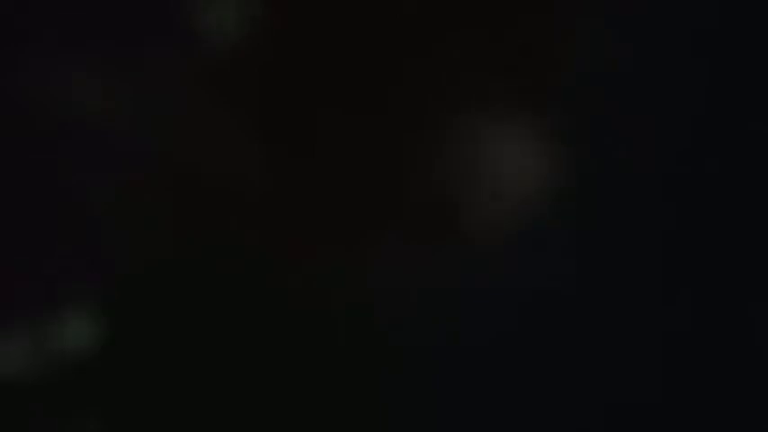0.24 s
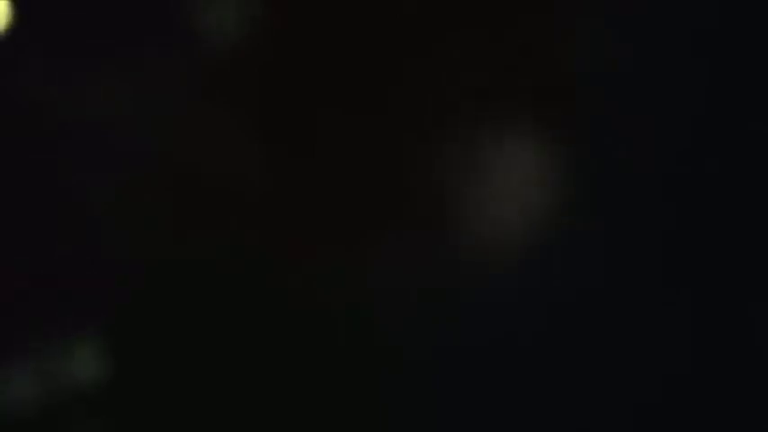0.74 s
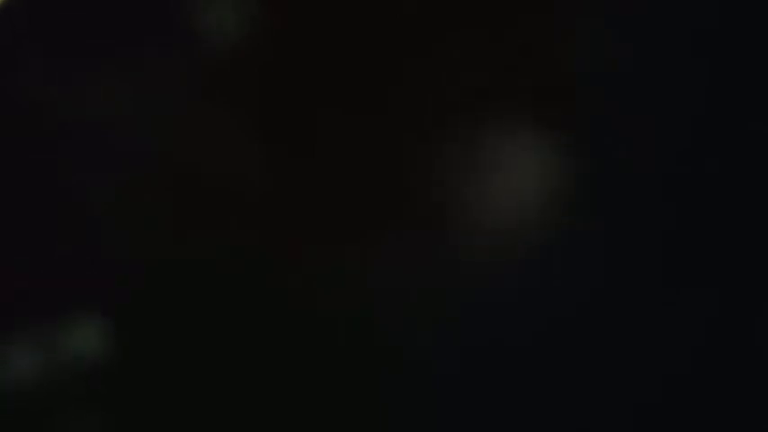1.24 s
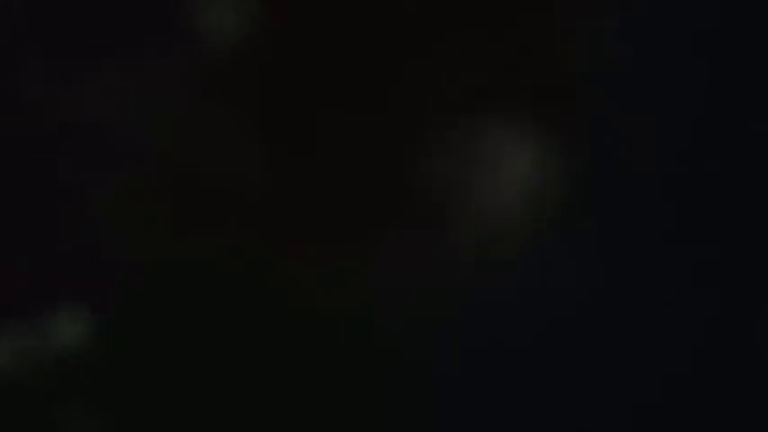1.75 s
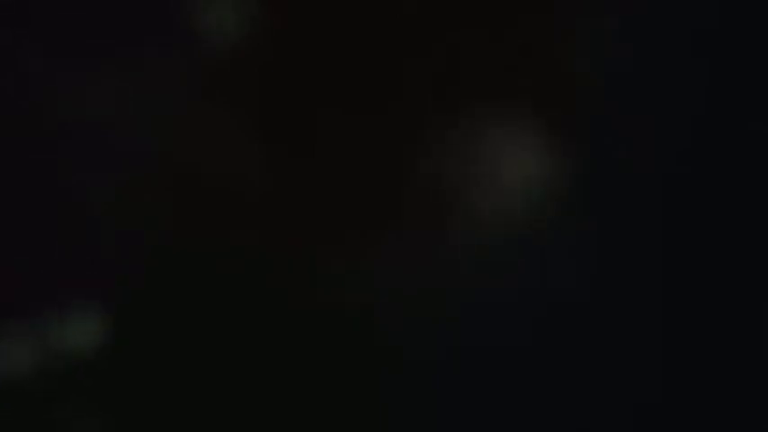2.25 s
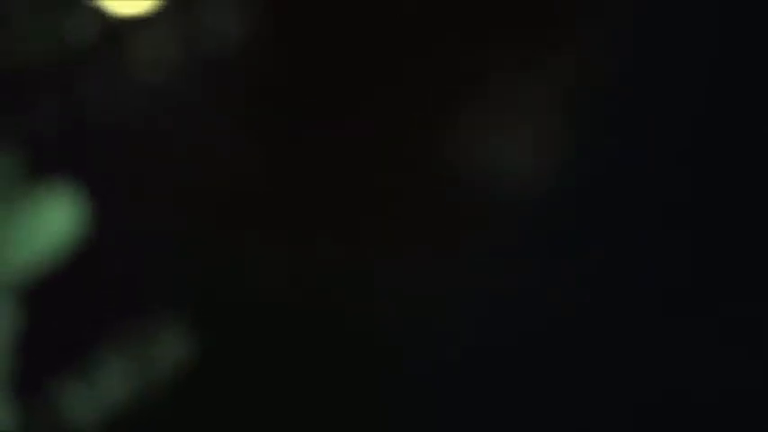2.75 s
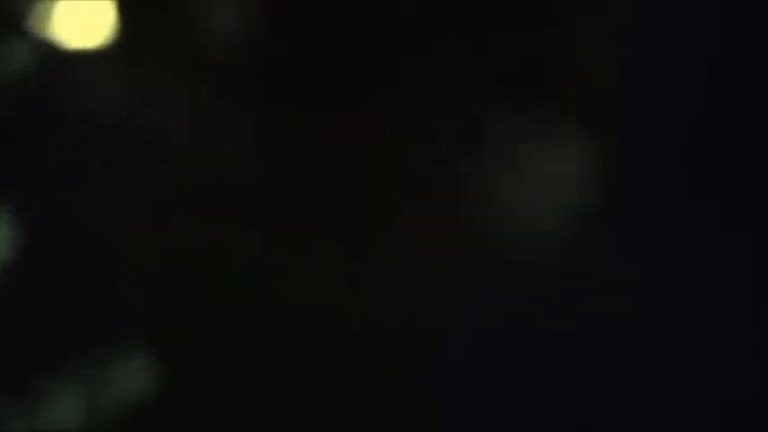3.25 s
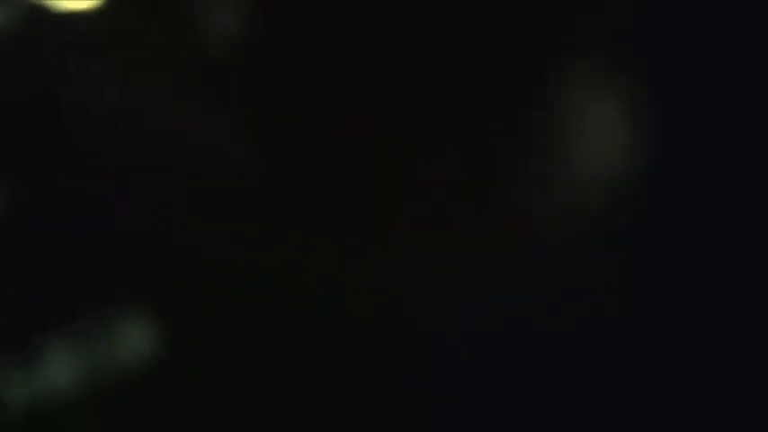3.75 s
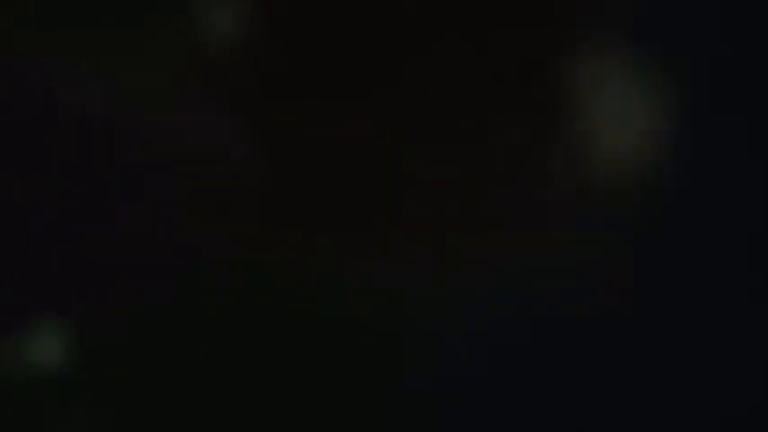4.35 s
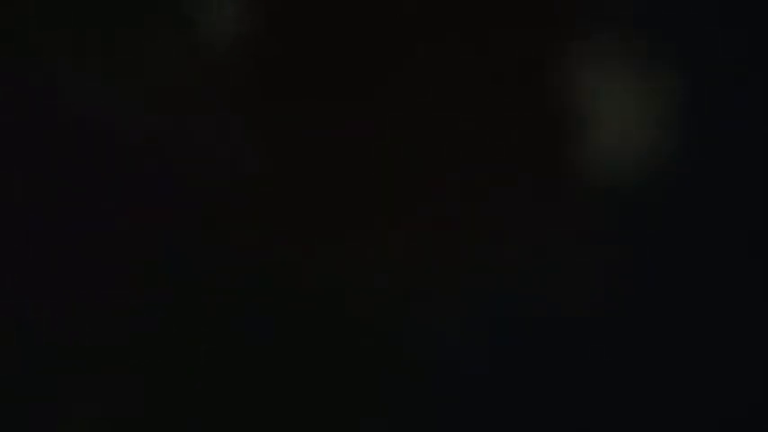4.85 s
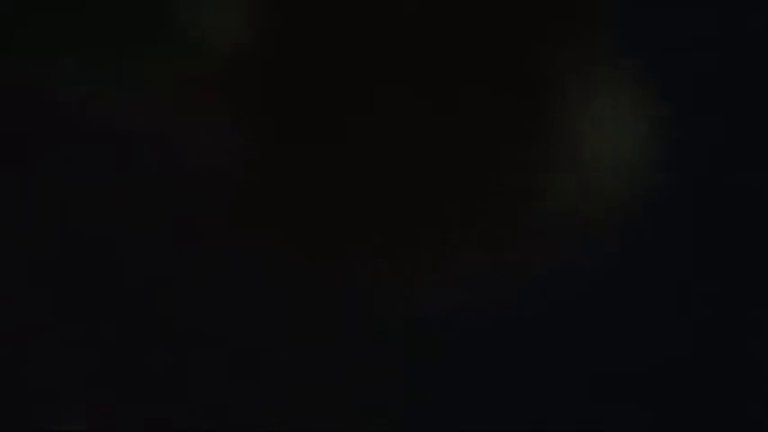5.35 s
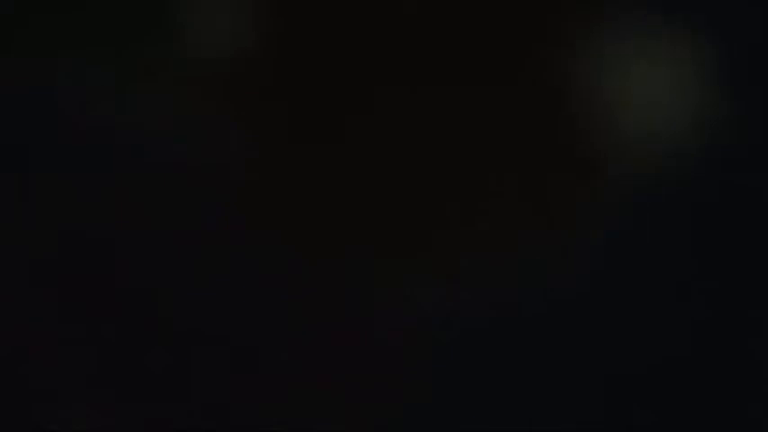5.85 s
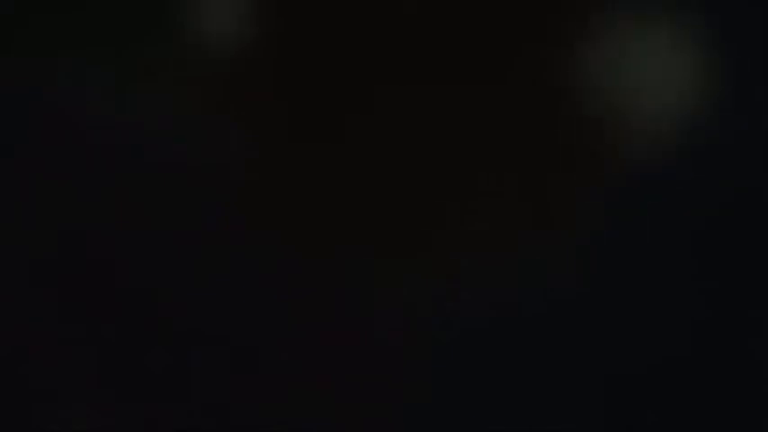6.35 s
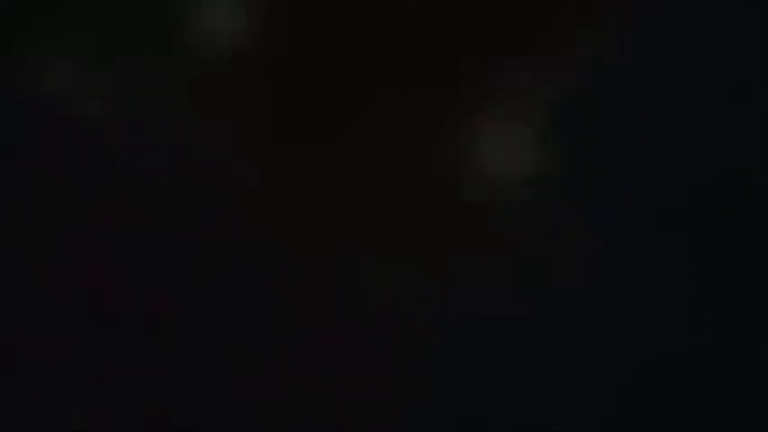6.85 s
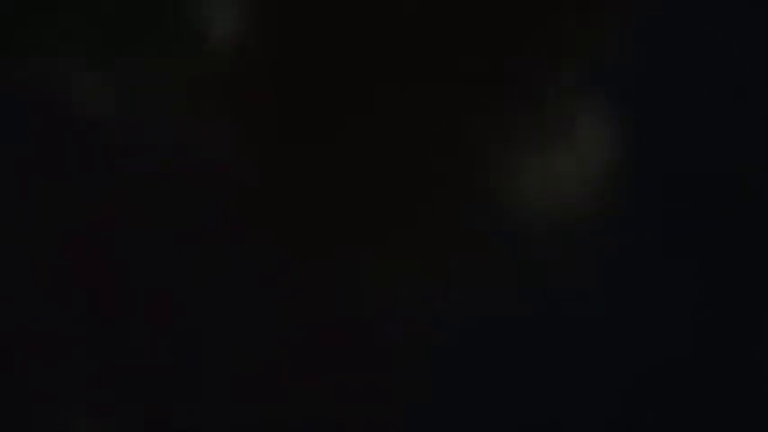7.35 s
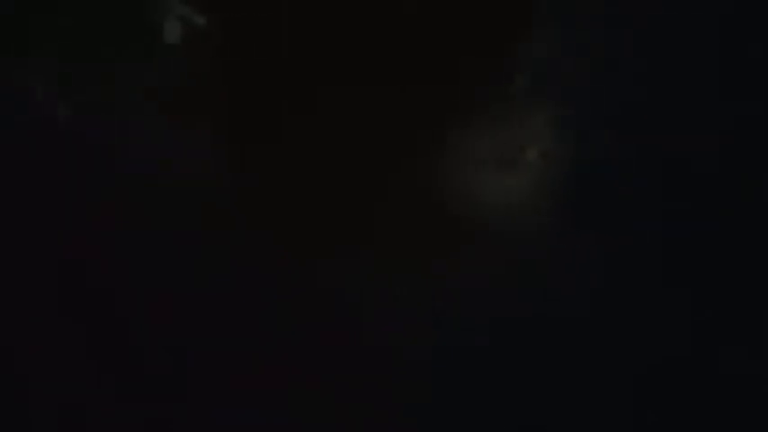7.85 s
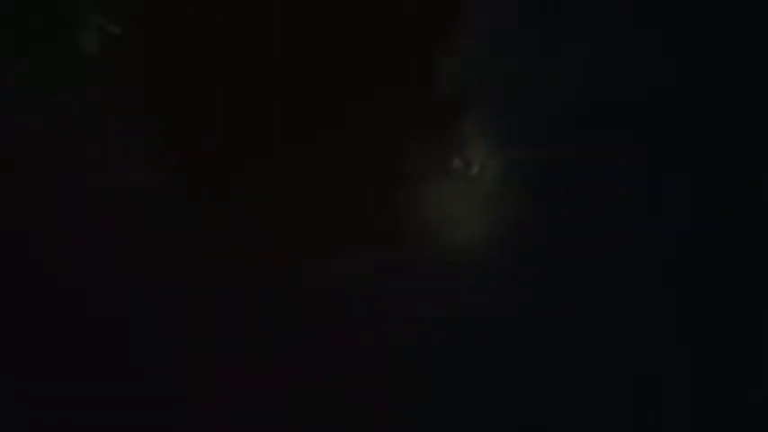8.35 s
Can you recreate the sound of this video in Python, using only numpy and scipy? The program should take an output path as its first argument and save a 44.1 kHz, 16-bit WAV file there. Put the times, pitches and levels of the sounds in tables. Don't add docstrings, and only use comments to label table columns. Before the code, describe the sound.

Outdoor woods at night, small camera microphone near a bow. A close katydid scrapes in phrases above faint distant insects while twigs tick. A loud slap, rattle and strike follow, then a hog's harsh, overloaded scream echoes off trunks. It pants quickly, squeals again, barks and groans, then low rough grunts thin out amid rustling leaves and soft ground rumble. Late dull bumps hit the camera.

```python
import sys
import numpy as np
from scipy import signal
from scipy.fft import rfft, irfft, next_fast_len
from scipy.io import wavfile
from scipy.ndimage import uniform_filter1d, minimum_filter1d

SR = 44100
rng = np.random.default_rng(int(sys.argv[2]) if len(sys.argv) > 2 else 0)


def dump(signal):
    limited = np.clip(np.atleast_2d(signal).T, -1, 1)
    pcm = np.round(limited * 32767).astype(np.int16)
    wavfile.write(sys.argv[1], SR, pcm)


def to_linear_factor(level_db):
    exponent = np.asarray(level_db, float) / 20
    return 10 ** exponent


N = 378819


def hog():
    gate, effort_db, rate, rough, gape, mouth_hz, flare_db = calls()
    rough = np.clip(rough, 0, 1)
    tear = gape * rough ** 2
    later = since(4.0) > 0
    chest, belly_db, throat, mouth, snout, shrill_db, reach = airway_tuning(
        effort_db, rate, rough, gape, tear, mouth_hz, flare_db, later)
    (chest_hz, chest_db), (throat_hz, throat_db) = chest, throat
    (mouth_hz, mouth_db), (snout_hz, snout_db) = mouth, snout

    beats, phase = pulses(rate * np.exp(.08 * rough ** 2 * wander(size=200)), gate)
    beats *= to_linear_factor(0.83 * rough * wander(size=100) + 1.0 * (rate < 100) * wander(size=300))
    puffs = evened((.5 + np.exp(-phase / .35)) * rng.standard_normal(N))
    total = np.sqrt(sum(to_linear_factor(db) ** 2 for db in (mouth_db, chest_db, throat_db, snout_db)))
    breath = gate * to_linear_factor(effort_db - 3.5) / total
    clear = breath * np.sqrt(1 - rough) * beats
    torn = breath * np.sqrt(rough) * puffs
    torn = torn * to_linear_factor(3.5 * (tear ** 2 * wander(size=70) - tear ** 4 / 2))
    early_leak, late_leak = (signal.sosfilt(signal.butter(4, hz, "high", fs=SR, output="sos"), torn)
                             for hz in (560, 800))
    thin = np.where(later, late_leak, early_leak)
    airy = breath * (np.sqrt(.6 - .6 * rough) * beats + np.sqrt(.4 + .6 * rough) * puffs)

    lock = np.clip((.3 - rough) / .15, 0, 1) * np.clip((gape - .7) / .1, 0, 1)
    hush_db = -6 * lock
    hum_db = chest_db - 4.5 - np.maximum(chest_hz - 470, 0) / 4 - np.maximum(200 - rate, 0) / 5
    grunt_db = chest_db - 5 - np.maximum(effort_db + 34.5, 0) - 40 * (rate > 100)
    bright_db = snout_db + shrill_db
    seventh_hz = np.where(later, 6800, 7200) * reach
    # drive, ring [Hz], width [Hz], level [dB]
    airway = [(breath * beats, rate, 70, hum_db),
              (clear, chest_hz, 70, chest_db),
              (clear, chest_hz, 36, belly_db),
              (-clear, throat_hz, 220, throat_db),
              (clear, mouth_hz, 330, mouth_db - 2 * lock),
              (-clear, snout_hz, 330, snout_db - 10.0),
              (torn, chest_hz * 1.037, 180, chest_db + 8.5),
              (thin, throat_hz, 420, throat_db),
              (thin, mouth_hz, 650, mouth_db + hush_db),
              (thin, snout_hz, 750, snout_db - 0.5 + hush_db / 2),
              (airy, 5130 * reach, 460, bright_db + 3.8),
              (airy, 5300 * reach, 1600, bright_db - 19 - 6 * later),
              (clear, 270, 140, grunt_db),
              (-airy, seventh_hz, 900, bright_db + 3.0 * later),
              (airy, 9000, 2500, bright_db - 9)]
    shake = 1 + .02 * rough * wander(size=400)
    voice = 0
    for drive, hz, width, db in airway:
        level = to_linear_factor(db + (.8 + 1.6 * rough) * wander(size=900))
        voice = voice + level * resonate(drive, hz * shake, width, count=2)
    voice += rasp(thin, rough, tear, hush_db, mouth_hz)
    voice += breath * whistle(phase, rough, gape, later)
    return signal.sosfilt(signal.butter(3, [165, 13500], "band", fs=SR, output="sos"), voice)


# (time [s], stretch [ratio], level [dB])
SHRILL = [(2.8, 1.03, -6), (3.2, 1.1, 0), (3.31, 1.04, -1.5), (3.36, .98, -2), (3.43, 0.99, 0),
          (3.48, 0.99, -0.5), (3.58, .99, -1), (3.66, 0.95, 1.5), (3.72, 1.1, 6), (4.9, 1.06, -1.5),
          (5.1, 0.996, -1), (5.22, 1.01, 4.5), (5.35, 0.98, 2), (5.52, 1.01, -4.5), (5.98, 1.04, 11),
          (6.1, 0.84, 6), (6.25, 1.18, 7.5), (6.45, 1.0, 4.5), (8.59, 1.1, -8)]


def airway_tuning(effort_db, rate, rough, gape, tear, mouth_hz, flare_db, later):
    def jaw(shut, wide, opening):
        return shut + (wide - shut) * opening

    chest_lift_db, throat_push_db, mouth_stretch, snout_stretch = posture()
    chest_db = jaw(0.5, -29.5, abs(gape) ** 0.63) + chest_lift_db
    throat_db = jaw(-1, -51, abs(gape) ** 1.78) + throat_push_db + 14.5 * tear
    throat_hz = jaw(1025, 1500, gape) - 330 * tear
    mouth_db = -6 * np.clip(1 - gape, 0, 1) ** 2
    snout_db = jaw(-1.5, -3, gape) + flare_db

    cleared = np.clip(np.maximum((gape - 0.435) / 0.044, (effort_db + 17) / 5), 0, 1)
    snout_hz = jaw(2383, 3302 + mouth_hz - 1750, cleared)
    snout_hz = snout_hz * (1 + 0.039 * tear * wander(size=1200))
    stretch, ring_db = curves([SHRILL])[1:]
    reach = (snout_hz / 3400) ** 0.15 * stretch
    shrill_db = jaw(-31, -9.5, gape) - 16 * tear ** 2 + ring_db
    shrill_db = shrill_db + np.where(later, -3, -4) + 3 * wander(size=1300) * gape

    chest_hz = 400 + 20.5 * np.clip(effort_db + 19, 0, 10) * gape * (0.34 + 1.15 * rough)
    chest_hz += 40 * np.clip((rate - 80) / 10, 0, 1) * np.clip((160 - rate) / 50, 0, 1)
    chest_hz -= 5.5 * np.clip(-18 - effort_db, 0, 14) * np.clip((130 - rate) / 30, 0, 1)
    belly_db = chest_db - 7 + 1.3 * np.maximum(effort_db + 26, -20) - np.maximum(rate - 106, 0) / 2
    return ((chest_hz, chest_db), belly_db, (throat_hz, throat_db), (mouth_hz * mouth_stretch, mouth_db),
            (snout_hz * snout_stretch, snout_db), shrill_db, reach)


def rasp(thin, rough, tear, hush_db, mouth_hz):
    tearing = to_linear_factor(3.0) * resonate(thin * rough ** 1.01 * to_linear_factor(hush_db), 2060, 2710, count=2)
    tearing += to_linear_factor(-11.5 + 5.8 * wander(size=500)) * resonate(thin * tear, 4080, 1600, count=2)
    reed_hz = mouth_hz * (1 + .025 * wander(size=700))
    for k, db in enumerate((3.5, -14, -23), 1):
        overtone_hz = k * reed_hz * (1 - (k > 1) / 20)
        tearing += to_linear_factor(db - 2.5) * resonate(thin * tear, overtone_hz, k * 99, count=2)
    return tearing


def whistle(phase, rough, gape, later):
    waver = (.25 + 2.5 * rough) * wander(size=120)
    fold = 2 * np.pi * phase
    turn = fold * np.where(later, 8, 7) + waver
    upper = fold * np.where(later, 15, 14) + waver
    locked = np.clip((.45 - rough) / .2, 0, 1) * np.clip(rough / .17, .3, 1)
    locked = locked * np.clip((gape - .7) / .2, 0, 1) * to_linear_factor(np.where(later, -7, -6) + 2 * wander(size=500))
    upper_level = to_linear_factor(np.where(later, -4, -5) + 3 * wander(size=400))
    lower_level = to_linear_factor(np.where(later, -7, -5))
    below = np.sin(turn - fold) - .6 * np.cos(turn - 2 * fold)
    return locked * (np.cos(turn) + upper_level * np.sin(upper + waver) + lower_level * below)


# (time [s], effort [dB])
SCREAM_BREATH = [(2.827, -10.5), (3.15, -13.5), (3.24, -7.5), (3.42, -3.5), (3.486, -12), (3.518, -6),
                 (3.6, -14), (3.632, -11.5), (3.645, -8.5), (3.68, -14), (3.705, -24), (3.745, -54)]
SQUEAL_BREATH = [(4.96, -28), (4.99, -17.5), (5.196, -18), (5.29, -14), (5.345, -8), (5.452, -5),
                 (5.515, -6), (5.528, -20), (5.556, -27)]
BARK_BREATH = [(5.985, -29), (6.0, -17.5), (6.015, -12.5), (6.035, -10.5), (6.05, -18), (6.085, -30),
               (6.118, -42)]
HUFF_BREATH = [(6.244, -27), (6.255, -26), (6.29, -21), (6.329, -26)]
GROAN_BREATH = [(6.33, -27), (6.39, -19.5), (6.434, -20), (6.474, -19), (6.534, -20), (6.6, -30),
                (6.678, -45)]
# (time [s], fold rate [pulses/s], roughness [0-1], gape [0-1], mouth [Hz])
SCREAM = [(2.829, 290, 1.21, 0.5, 1772), (3.198, 258, 0.9, 0.84, 1877), (3.27, 266, .3, 1.0, 1880),
          (3.354, 233, .17, 1.1, 1680), (3.406, 250, .17, .95, 1750), (3.462, 220, .1, 1.0, 1600),
          (3.52, 232, .05, .95, 1760), (3.64, 242, .08, 1.0, 1800), (3.669, 231, 0.37, 0.97, 1970)]
SQUEAL = [(4.96, 232, .42, .6, 1770), (5.08, 232, .42, .8, 1910), (5.2, 233, .4, .8, 2000),
          (5.25, 232, .15, .8, 1750), (5.38, 233, .09, .85, 1760), (5.515, 234, .07, .95, 1786),
          (5.535, 230, .7, .8, 1900)]
BARK = [(5.987, 230, .55, 0.51, 1940), (6.032, 245, 0.46, 0.66, 1770), (6.118, 210, 0.56, 1, 1880)]
HUFF = [(6.244, 120, 0.43, 0.15, 1900), (6.329, 150, .55, 0.33, 1890)]
GROAN = [(6.33, 140, .75, .4, 1800), (6.421, 93, .45, .32, 1850), (6.49, 90, .35, .19, 1850),
         (6.56, 88, .45, .3, 1650), (6.63, 60, .2, .2, 1700)]
# (start [s], swell [s], effort [dB], gape [0-1], nostril flare [dB])
PANTS = [(4.292, 0.037, -39, 0.06, 6), (4.449, 0.04, -31, 0.13, -40), (4.591, 0.027, -20, 0.38, 0.5),
         (4.727, 0.047, -20.5, 0.48, -2.5), (4.84, 0.079, -19, 0.64, 0.5), (6.121, 0.05, -22, 0.4, 7)]
# (start [s], swell [s], effort [dB], fold rate [pulses/s], nostril flare [dB])
GRUNTS = [(5.558, 0.003, -29.5, 101, -15), (5.855, 0.032, -10, 61.7, -2), (5.8985, 0.00198, -13, 88, -2.5),
          (6.704, 0.055, -22, 50.7, 3), (6.766, 0.0021, -17, 72.5, 2.5), (6.807, 0.0023, -23, 62, 4),
          (6.856, 0.0042, -33.5, 66, -20), (6.967, 0.0023, -30.5, 38, 18), (7.029, 0.0035, -16, 49, -1.5),
          (7.204, 0.027, -20.5, 61, 4.5), (7.36, 0.0028, -32.5, 55, 11), (7.4, 0.0011, -32.5, 59, 6.5),
          (7.562, 0.0083, -32, 80, -10)]


def calls():
    cries = []
    for breath, folds, flare_db in ((SCREAM_BREATH, SCREAM, 6.5),
                                    (SQUEAL_BREATH, SQUEAL, 0), (GROAN_BREATH, GROAN, 0),
                                    (BARK_BREATH, BARK, 0), (HUFF_BREATH, HUFF, 8)):
        flare = flare_db * np.minimum(since(folds[-2][0]) / 0.043, 1)
        cries.append((breath[0][0], [*curves([breath]), *curves([folds])[1:], flare]))
    for start, swell, db, gape, flare in PANTS:
        cries.append(short_call(start, swell, db, 200 + 70 * gape, .48, gape, flare))
    for start, swell, db, rate, flare in GRUNTS:
        rough = .1 + .018 * max(rate - 66, 0)
        cries.append(short_call(start, swell, db, rate, rough, .05, flare))
    out = np.zeros((7, N)) + [[0], [-99], [250], [.5], [.5], [1900], [0]]
    for s, controls in sorted(cries, key=lambda c: c[0]):
        at = round(s * SR)
        for k, c in enumerate(controls):
            out[k, at:] = (c * np.ones(N))[at:]
        out[0, at - 60:at] = 0
    out[0] = uniform_filter1d(out[0], size=130)
    return out


def short_call(start, swell, effort_db, rate, rough, gape, flare_db):
    t = since(start)
    dying = np.maximum(t - swell, 0) / 0.06
    swell_db = max(effort_db + 34, 14)
    level_db = effort_db - swell_db * np.maximum(1 - t / swell, 0) ** 2.3 - 23 * dying ** 1.46
    mouth_hz = 1800 + 60 * max(-20 - effort_db, 0)
    slip = np.minimum(dying, 1) * np.clip((effort_db + 25) / 12, .3, 1) * (1 - gape)
    rough = rough + .6 * np.minimum(dying, 1) * (1 - gape)
    return start, [level_db > -75, level_db, rate * (1 + 1.1 * slip), rough, gape, mouth_hz, flare_db]


# (time [s], chest [dB], throat [dB], mouth stretch [ratio], snout stretch [ratio])
POSTURE = [(0, 0, 2, 1.1, 1.04), (2.865, -20, -8, 0.92, 0.94), (2.949, -2, 5, 1.066, 1.004),
           (3.1, -0.5, 3.5, 1, 0.95), (3.2, -1, -11, 1.04, 1.025), (3.34, -2, -3, 1.05, 1.075),
           (3.47, -4.5, 0, 1, 1.04), (4.44, -7, 4, 0.86, .9), (4.58, -3, 11, 0.96, 1.02),
           (4.72, -3, 11, 1.07, 1.1), (4.83, 0, 4, 1.03, 1.03), (4.955, 0.5, 17, 0.96, 0.96),
           (5.04, 3.5, 15, 0.98, 1.04), (5.14, 4, 13, 1.006, 1.03), (5.27, 3, 0, 0.99, 0.96),
           (5.4, 3.5, 1, 1.004, 1.03), (5.85, 11, 14, 1.1, 0.68), (5.879, -1.5, 3, 1.06, 0.97),
           (5.98, 6.5, 15.5, 1.034, 0.96), (6.11, 0, 15, 0.99, 0.96), (6.24, -16, -37, 1.07, 1.08),
           (6.331, -2.5, -1.5, 0.93, 1.25), (6.43, 2, 4.5, 0.95, 1), (6.5, -2.5, -4, 1.04, 1.18),
           (6.69, -3.5, -2.5, 0.83, 1.06), (6.92, 3, -6, 1.13, 1.05), (7.019, -3.5, -1, 0.92, 0.99),
           (7.2, 0, 7, 0.99, 0.95), (7.35, 3.5, 8.5, 0.71, 0.95), (7.54, -2.5, 4.5, 0.85, 0.64)]


def posture():
    s, *columns = np.transpose(POSTURE)
    row = np.searchsorted(s, np.arange(N) / SR, "right") - 1
    return [uniform_filter1d(c[row], size=600) for c in columns]


# (time [s], peak [dB], ring [Hz])
KNOCKS = [(2.828, -1.5, 930), (2.935, -20, 1080), (2.972, -10, 785), (3.006, -14, 830), (3.056, -16, 837),
          (3.092, -13, 800), (3.112, -10.5, 704), (3.148, -11, 716), (3.221, -11, 775), (3.238, -19, 820)]


def throat_knocks():
    return clicks([(*row, -20) for row in KNOCKS], 4.5, .005, 2500)


# (start [s], rise [s], hold [s], low body [dB], bright hiss [dB])
BURSTS = [
    (2.507, 0.027, 0.018, -17, -14.5),
    (2.719, 0.00097, 0.00072, -34.5, -37),
    (2.733, 0.011, 0.016, -66, -25),
]
# (frequency [Hz], level [dB per Hz])
BODY = [(35, -63), (60, -30), (125, -40), (216, -26), (486, -23), (776, -27), (2500, -33), (4000, -85)]
# (frequency [Hz], level [dB per Hz])
HISS = [(710, -40), (1200, -16), (2080, -6), (3210, -7.5), (3890, -2), (4380, -2), (10400, -7.5),
        (15800, -18)]


def bow():
    body = hiss = air = 0
    for s, rise, hold, body_db, hiss_db in BURSTS:
        up, after = np.minimum(since(s) / rise, 1), since(s + rise + hold)
        shape = up * (to_linear_factor(-60 * after / 0.19) + to_linear_factor(-11 - 60 * after / 1))
        body = body + to_linear_factor(body_db) * shape * up ** 2
        hiss = hiss + to_linear_factor(hiss_db) * shape
        air = air + to_linear_factor(hiss_db - 20) * up * to_linear_factor(-60 * after / 0.42)
    near = [(100, 0.85), (4000, 0.93), (10000, .84), (14000, 0.55)]  # (Hz, left-right likeness)
    rattle = body * noise(BODY, near, 1.2) + hiss * to_linear_factor([[1.1], [-.9]]) * noise(HISS, near, 1.0)
    rattle += air * np.array([resonate(v, 12000, 6000) for v in rng.standard_normal((2, N))])
    t = since(2.53)
    handle = to_linear_factor(-14.5 - 60 * t / 0.22) * np.minimum(t / .008, 1)
    rattle += handle * resonate(rng.standard_normal(N), 510, 210)
    limbs = to_linear_factor(-33.0 - 60 * t / 0.79 + 5.3 * wander(size=700)) * np.sin(2 * np.pi * 140 * t)
    return to_linear_factor(1.1 * wander(size=40)) * rattle + limbs


# (time [s], peak [dB], ring [Hz], bright edge [dB])
TICKS = [(2.5055, -3.5, 7000, -17), (2.5095, 1, 9100, -30), (2.52, -6, 9000, -15), (2.524, -20, 3000, -15),
         (2.5295, -9, 5200, -17), (2.537, -7, 2430, -19), (2.549, -15, 3920, -26), (2.65, -18, 2250, -4.5),
         (2.726, -7.5, 984, 2), (2.752, -0.5, 9650, -17), (2.816, -49.5, 2920, 32.5)]


def bow_ticks():
    return clicks(TICKS, 2.8, 0.0049, 10000)


# (time [s], peak [dB], ring [Hz], bright edge [dB])
THUMPS = [(3.645, -13, 176, -7), (8.069, -11, 453, -18), (8.074, -11.5, 222, -32), (8.175, -28, 119, -35),
          (8.289, -26, 227, -41)]


def camera_thumps():
    return clicks(THUMPS, 0.6, 0.01, 10400)


# (time [s], peak [dB], ring [Hz])
TWIGS = [(0.046, -21.5, 1310), (0.057, -21.5, 1900), (0.097, -20.5, 1270), (0.211, -30, 1120),
         (0.28, -29, 1840), (0.306, -30, 680), (0.808, -28, 1620), (0.933, -20, 1930), (1.201, -30, 2140),
         (1.448, -23.5, 3360), (1.477, -30.5, 1120), (1.817, -23, 1410), (1.842, -26.5, 1076),
         (1.96, -32.5, 800), (2.148, -24.5, 1020), (2.191, -23, 1140), (2.229, -22.5, 1398),
         (2.309, -28, 2520), (2.408, -24, 1080), (2.424, -27, 2970), (2.448, -26, 940), (2.459, -22, 1700),
         (2.476, -18, 1760), (2.49, -20, 1840), (4.005, -18.5, 1900), (6.389, -11.5, 1180),
         (6.743, -16, 2900), (6.767, -23, 1100), (8.425, -24.5, 2480)]


def twigs():
    return clicks([(*row, -14) for row in TWIGS], 1.7, 0.007, 4700)


# (time [s], peak [dB], ring [Hz], crunch [dB])
STEPS = [(3.757, -28, 413, -5.5), (3.975, -24, 418, -12), (6.915, -33, 310, 3), (6.932, -33, 340, 4.5),
         (6.968, -27, 430, -9), (7.785, -24, 637, -2), (8.388, -40.5, 700, 3), (8.513, -30.5, 660, -5)]


def steps():
    return clicks(STEPS, 2.04, 0.011, 1240)


# (start [s], length [s], peak [dB], fade [dB/s])
LEAVES = [(3.703, 0.051, -28, 509), (3.714, 1, -38.5, 2.5), (5.94, 0.67, -40.5, 6),
          (6.902, 0.098, -38.5, 263), (8.067, .14, -26, 243)]


def leaves():
    level = 0
    for s, length, db, fade in LEAVES:
        attack = np.minimum(since(s) / 0.00074, 1)
        level = level + attack * to_linear_factor(db - fade * since(s) - 40 * since(s + length))
    crackle = to_linear_factor(1.0 * evened(uniform_filter1d(rng.standard_normal(N), size=40)))
    colour = [(120, -4), (300, -9.0), (1000, -18.0), (2500, -18.5),
              (6000, -17.0), (11000, -18.5), (16000, -35)]
    return level * to_linear_factor(-4) * evened(crackle) * noise(colour, [(1000, 1.0), (15000, 0.8)], 2.5)


# (time [s], rumble [dB])
TRAMPLE = [(2.7, -45), (2.76, -31), (2.9, -72), (5.4, -60), (5.58, -41), (5.7, -63), (6.6, -55),
           (6.93, -46), (7.3, -50), (8.59, -60.5)]


def trample():
    gate, db = curves([TRAMPLE])
    return gate * to_linear_factor(db + 2 * wander(size=900)) * resonate(rng.standard_normal(N), 96, 110, count=2)


# (start [s], end [s])
KATYDID = [
    (0.0, 0.96),
    (1.125, 2.11),
    (2.25, 2.5),
]


def katydid():
    singing = sum((since(end) == 0) * (np.arange(N) >= start * SR) for start, end in KATYDID)
    gate = 1. * (since(KATYDID[-1][1]) == 0)
    resting = 1 - uniform_filter1d(1. * singing, round(0.024 * SR))
    db = -43 - 6.5 * gate * resting
    rate = 71 * (1 + 0.017 * evened(uniform_filter1d(rng.standard_normal(N), size=9000)))
    strokes = .7 + np.cos(np.pi * np.cumsum(rate) / SR) ** 2
    teeth = pulses(4 * rate, gate)[0] * strokes + 0.83 * strokes * rng.standard_normal(N)
    near = gate * to_linear_factor(db) * evened(resonate(teeth, 5090, 390, count=2))
    return near * to_linear_factor([[-.7], [.7]])


# (frequency [Hz], width [Hz], level [dB])
CHOIR = [(120, 13, -63.5), (3824, 66, -54), (4295, 300, -53.5), (4650, 98, -57), (7760, 980, -59),
         (8280, 190, -63.5), (13700, 60, -86), (15000, 100, -98)]


def far_choir():
    middle, side = (sum(to_linear_factor(db) * resonate(air, hz, width) for hz, width, db in CHOIR)
                    for air in rng.standard_normal((2, N)))
    return middle + 0.28 * np.outer([1, -1], side)


# (frequency [Hz], level [dB per Hz])
NIGHT = [(20, -0.5), (145, 5), (318, -2.5), (844, -0.5), (3300, -7.5), (5800, -10.5), (9000, -19),
         (15800, -17.5)]
# (frequency [Hz], likeness [0-1])
SAME = [(60, 1), (240, 0.78), (950, 0.039), (3770, 0.48), (15000, 0.59)]


def night_air():
    return to_linear_factor(-44.5) * noise(NIGHT, SAME, 1.8)


# (time [s], level [dB])
ECHO = [(0, -13), (3.6, -11), (3.67, -15.5), (4.4, -20), (5.3, -2), (5.52, -34), (5.56, -13), (8.59, -25)]
# (frequency [Hz], time to fall 60 dB [s])
TREES = [(200, 0.23), (1800, 0.89), (5000, 1), (12000, 0.53)]


def trees(x):
    taps = np.zeros((2, SR))
    at = np.arange(900, SR - 20, 20) + rng.integers(0, 20, (2, (SR - 901) // 20))
    np.put_along_axis(taps, at, rng.choice([-1., 1.], at.shape), 1)
    hz, t, z = signal.stft(taps, SR, nperseg=256)
    tail = signal.istft(z * to_linear_factor(-60 * t / read(TREES, hz)[:, None]), SR, nperseg=256)[1]
    tail[1] = 0.8 * tail[0] + 0.85 * tail[1]
    sent = to_linear_factor(curves([ECHO])[1]) * x
    return signal.fftconvolve(sent[None], tail / np.linalg.norm(tail[0]), axes=1)[:, :N]


# (frequency [Hz], left minus right [dB])
PORT_DB = [(60, -12), (180, -0.5), (550, 2), (1650, 0.5), (4970, 1), (15000, -1)]


def ports(x):
    size = next_fast_len(N)
    half = to_linear_factor(read(PORT_DB, np.fft.rfftfreq(size, 1 / SR)) / 2)
    return irfft(rfft(x, size) * np.array([half, 1 / half]), size)[:, :N]


def clicks(events, cycles, edge_s, edge_hz):
    out, t = np.zeros(N), np.arange(4000) / SR
    dull = signal.butter(2, [160, min(edge_hz, SR / 2.5)], "band", fs=SR)
    for (s, db, hz, edge_db), grit in zip(events, rng.standard_normal((len(events), len(t)))):
        ring = np.sin(2 * np.pi * hz * t) * np.exp(-t * hz / cycles) * (1 - np.exp(-t * hz * 3))
        edge = evened(signal.lfilter(*dull, grit)) * np.exp(-t / edge_s)
        add(out, s, to_linear_factor(db) * (1.07 * ring + to_linear_factor(edge_db) * edge))
    return out


def pulses(rate, gate):
    turns = np.cumsum(rate) / SR
    turns -= np.maximum.accumulate(turns * (gate < np.sqrt(.8))) + 1 / SR
    at = np.flatnonzero(np.diff(np.floor(turns)) > 0)
    late = np.clip(turns[at + 1] % 1 * SR / rate[at + 1], 0, 1)
    train = np.zeros(N)
    train[at], train[at + 1] = late, 1 - late
    return train * np.sqrt(SR / rate), turns % 1


def resonate(x, hz, width, count=1):
    turn = np.exp(2j * np.pi * np.cumsum(hz * np.ones(len(x))) / SR)
    r = np.exp(-np.pi * width / SR)
    low = x / turn + 1e-18
    for _ in range(count):
        low = signal.lfilter([1 - r], [1, -r], low)
    return 2 * (turn * low).real * np.sqrt(count * SR / (np.pi * width))


def noise(spectrum, same, patchy_db):
    frames, hz = N // 128 + 5, np.fft.rfftfreq(512, 1 / SR)
    a, b, c, d, patches = rng.standard_normal((frames, 257, 5)).T
    patches = evened(uniform_filter1d(uniform_filter1d(patches, size=8, axis=0), size=16, axis=1))
    like, left = np.clip(read(same, hz), -1, 1)[:, None], a + 1j * b
    z = np.array([left, like * left + np.sqrt(1 - like ** 2) * (c + 1j * d)])
    z *= to_linear_factor(read(spectrum, hz)[:, None] + patchy_db * patches)
    return evened(signal.istft(z, nperseg=512, noverlap=384)[1][:, :N])


def wander(size):
    return evened(uniform_filter1d(uniform_filter1d(rng.standard_normal(N), size=size), size=size))


def since(s):
    return np.maximum(np.arange(N) / SR - s, 0)


def curves(tables):
    t, gate = np.arange(N) / SR, np.zeros(N)
    for rows in tables:
        gate[round(rows[0][0] * SR):round(rows[-1][0] * SR)] = 1
    s, *columns = np.transpose(np.concatenate(tables))
    return uniform_filter1d(gate, size=130), *(np.interp(t, s, c) for c in columns)


def evened(x):
    return x / np.sqrt(np.mean(x ** 2) + 1e-20)


def read(points, hz):
    f, value = np.transpose(points)
    return np.interp(np.log(hz + 1), np.log(f + 1), value)


def add(mix, s, sound):
    part = mix[round(s * SR):][:len(sound)]
    part += sound[:len(part)]


def scene():
    cry = hog() + throat_knocks()
    close = bow_ticks() + camera_thumps() + twigs() + steps()
    night = leaves() + trample() + katydid() + far_choir() + night_air()
    return ports(cry) + close + trees(cry + close) + bow() + night


def band_limit(x):
    return signal.sosfilt(signal.butter(12, 15990, fs=SR, output="sos"), x)


def record(dry):
    thin = signal.lfilter(*signal.butter(2, 50, "high", fs=SR), dry)
    room = minimum_filter1d(1.4 / np.maximum(abs(thin).max(0), 1.4), size=90)
    held = thin * uniform_filter1d(room, size=60)
    clipped = held / (1 + abs(held) ** 12) ** (1 / 12)
    top_cut = signal.firwin(255, 15850, window=("kaiser", 9), fs=SR)
    mix = signal.oaconvolve(clipped, top_cut[None], "same")
    return band_limit(mix)


dry = scene()
out = record(dry)
dump(out)
```